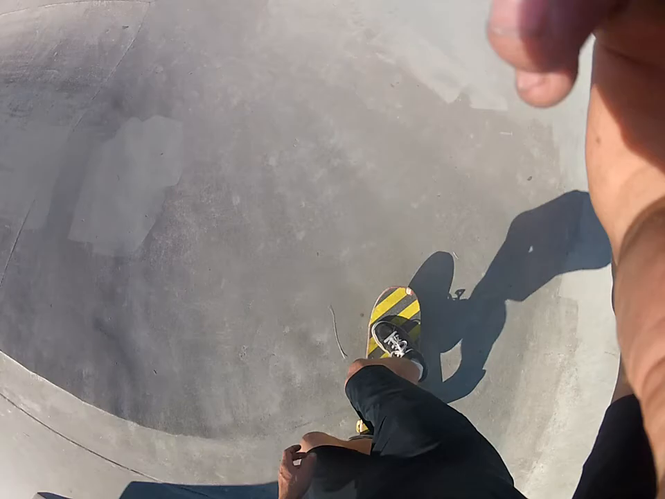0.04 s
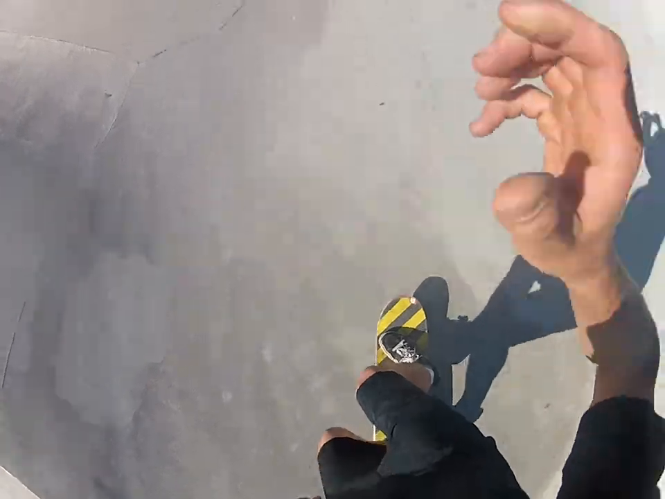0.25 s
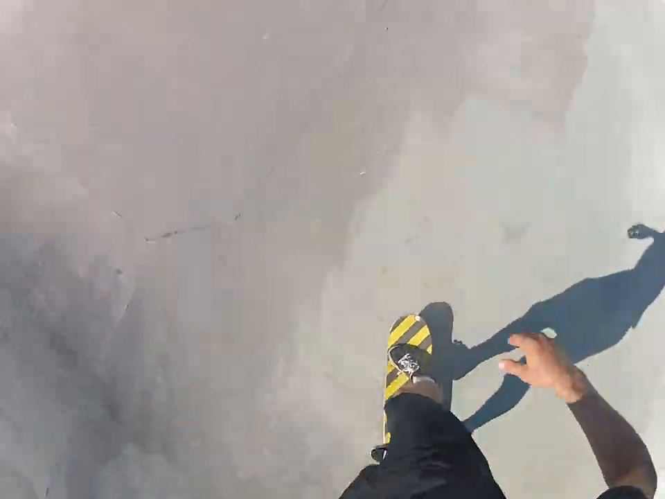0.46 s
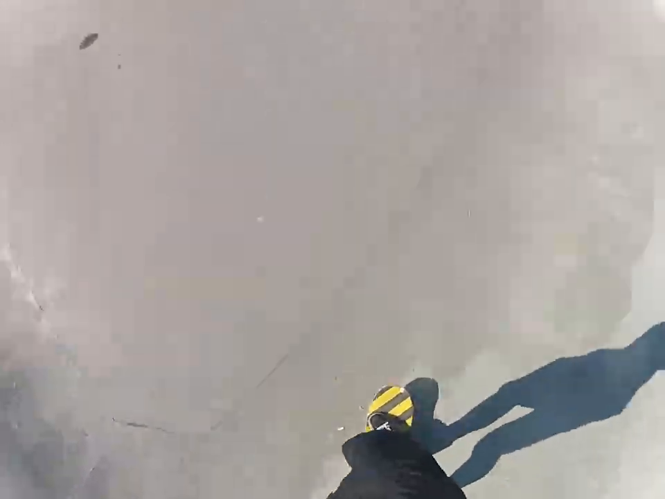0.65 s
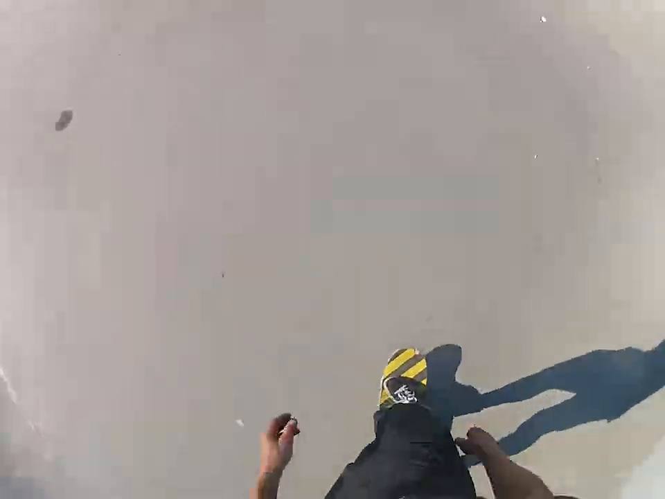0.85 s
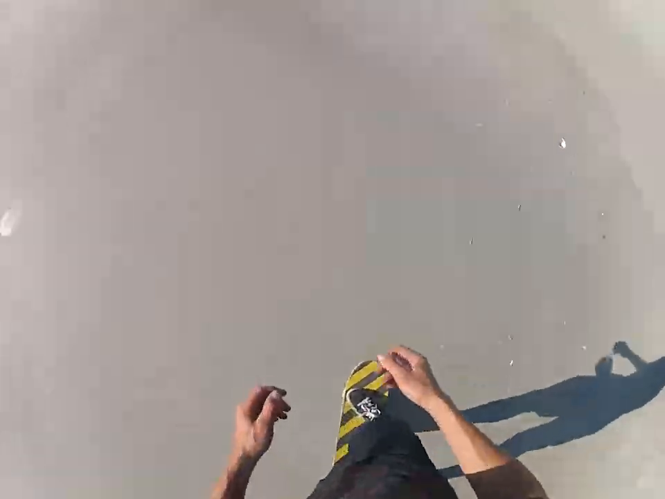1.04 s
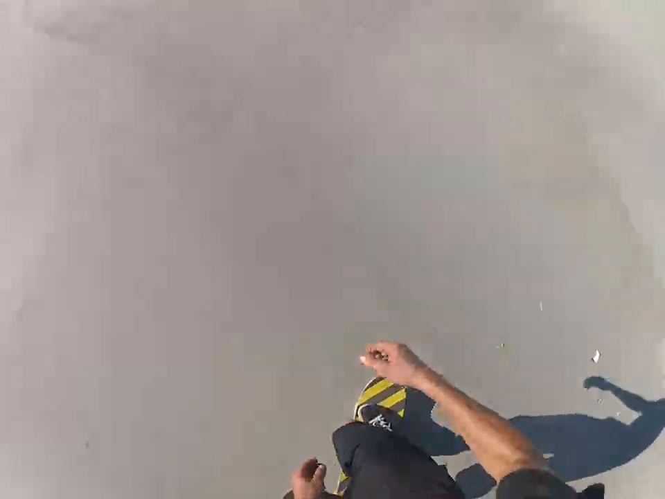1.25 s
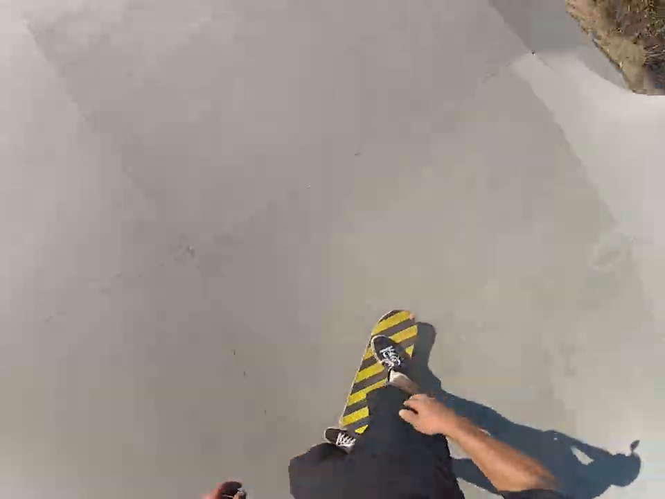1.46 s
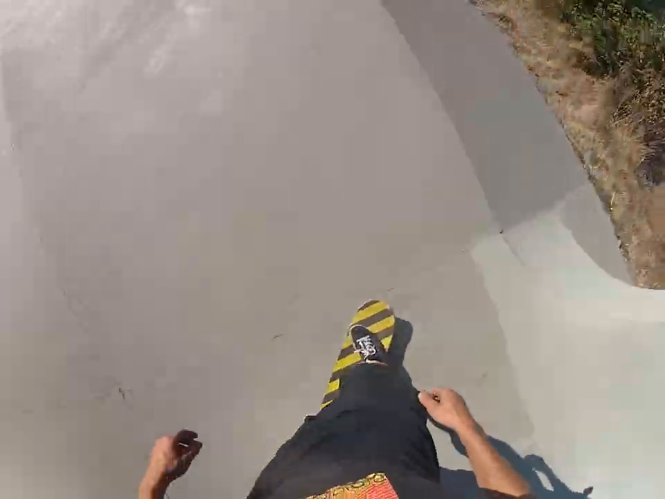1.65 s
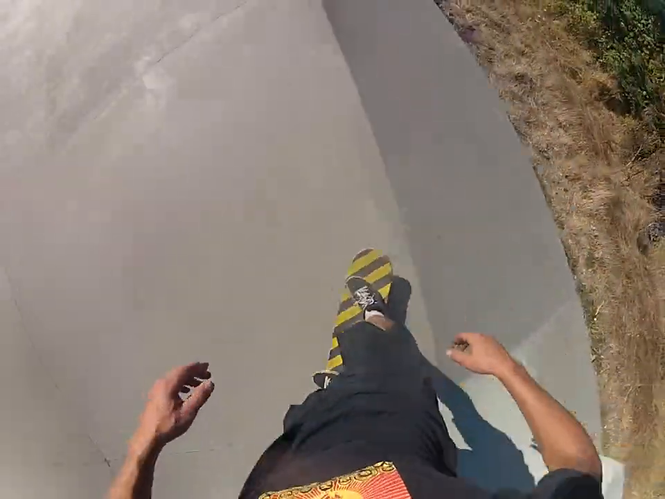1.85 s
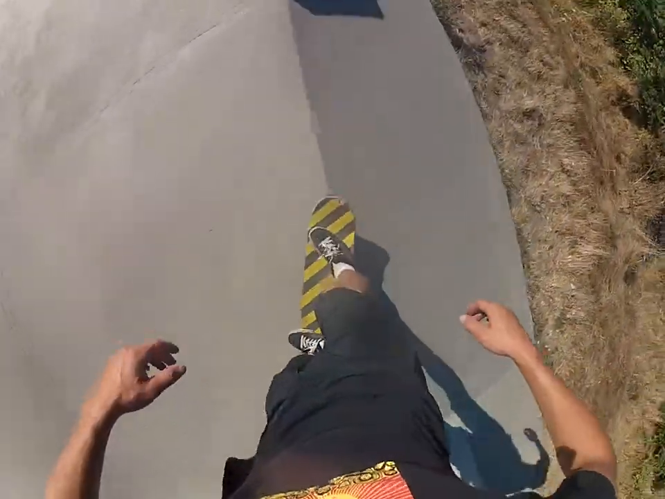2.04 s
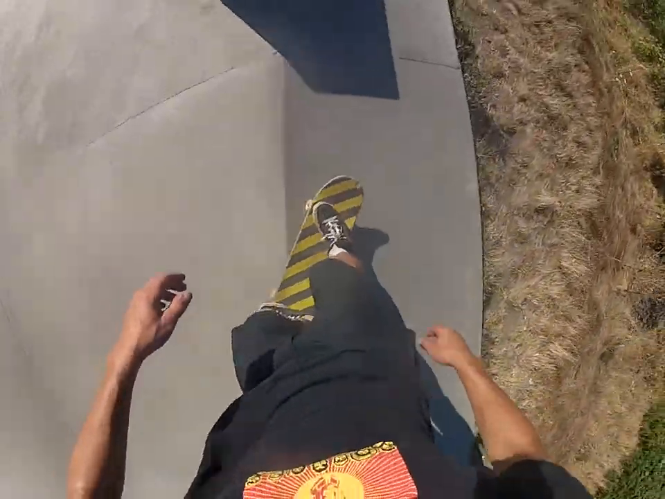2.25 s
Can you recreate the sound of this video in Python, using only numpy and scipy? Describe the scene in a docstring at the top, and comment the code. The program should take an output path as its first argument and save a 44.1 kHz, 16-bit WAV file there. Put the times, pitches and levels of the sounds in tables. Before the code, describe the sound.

Skateboard wheels roll with a soft roar around a smooth outdoor concrete bowl. Sharp plastic clacks and bumps hit the rider's microphone at the start, wind buffets it in short gusts, and lighter clacks return near the end.

```python
"""Skateboard wheels carve a smooth concrete bowl, heard from a camera worn by the rider.
The grain of the concrete makes them roar softly and scrub in the turns; the deck rumbles, grit ticks,
and wind buffets the microphone. Loose plastic, probably the camera mount, clacks against the case
in two short flurries. Low-rate sample-and-hold mirrors it all into a glassy treble."""
import sys
import numpy as np
from scipy import signal
from scipy.fft import rfft, irfft
from scipy.io import wavfile

SR = 44100
rng = np.random.default_rng(int(sys.argv[2]) if len(sys.argv) > 2 else 0)


def persist_wave(psi):
    """Save psi, clipped to +-1, as 16-bit WAV."""
    counts = np.round(np.clip(psi, -1, 1) * 32767).astype(np.int16)
    wavfile.write(sys.argv[1], SR, np.atleast_2d(counts).T)


N = 105840

START_S, FADE_IN_S = .1053, 0.00037
HOLD_HZ, BAND_HZ, TOP_HZ, MIRROR_DB = 12000, 5950, 15450, 0.45
GRIT_PER_S, GRIT_SPREAD_DB, GRIT_SHARE = 1800, 3.5, 0.45
ROAR_DB, HOLLOW_DB, HOLLOW_WIDTH_HZ = -0.5, -7, 186
TICK_DECAY_S, BREEZE_DB, BUMP_DECAY_CYCLES = 0.0053, -54, 0.54
SNAP_DB, SNAP_RISE_S, SNAP_DECAY_S = -5.5, 0.00014, 0.0019
RING_RISE_S, THUMP_S = 0.00022, 0.00066
RUSH_HISS_DB = -7

# ride of the rolling roar: t/s, level/dB, hollow centre f/Hz
ROLL_PATH = [(.1,-43,500),(.3,-48.5,480),(.48,-47.5,450),(.58,-45.5,540),(.78,-47,690),(.87,-48,600),(.97,-45,620),(1.1,-48.5,600),(1.23,-46.5,600),(1.38,-48,660),(1.53,-45.5,500),(1.68,-49.5,560),(1.8,-47.5,600),(2.0,-52.5,580),(2.2,-54,560),(2.4,-52.5,600)]
# tone of the roar: f/Hz, level/dB
ROAR_EQ = [(120,-1.5),(200,0.5),(300,-1),(520,-0.5),(720,-2.5),(840,-6),(950,-2),(1150,-10),(1600,-15),(2000,-14),(2900,-20.5),(3600,-24.5),(4400,-31),(5200,-27),(6000,-38)]
# dips in the concrete that swell the roar: t/s, half length/s, level/dB re the ride
CONCRETE_DIPS = [(.5,.03,-3),(.577,.018,-1),(1.226,.009,2),(1.53,.025,1)]
# tone of those swells: f/Hz, level/dB
DIP_EQ = [(150,-28),(400,-2.5),(560,7),(900,-15),(1600,-44)]
# deck vibration: t/s, level/dB
DECK_FADER = [(.1,-48.5),(.6,-43),(1.0,-42.5),(1.5,-45),(1.85,-48.5),(2.05,-50.5),(2.4,-55)]
# tone of the deck: f/Hz, level/dB
DECK_EQ = [(30,-1),(55,-4.5),(92,0),(140,-1.5),(200,-19.5),(350,-21.5),(800,-62)]
# sideways slip in the turns: t/s, level/dB
SCRUB_FADER = [(.1,-43),(.205,-54),(.233,-41),(.25,-58.5),(.3,-62.5),(.51,-66),(.555,-56.5),(.615,-54),(.66,-57.5),(.83,-54),(.92,-65.5),(1.45,-67),(1.66,-69.5),(2.0,-56.5),(2.15,-59),(2.24,-55.5),(2.3,-55.5),(2.4,-58.5)]
# tone of the slip: f/Hz, level/dB
SCRUB_EQ = [(300,-24.5),(1000,-10.5),(1350,2.5),(1650,-4),(2050,1),(2450,-1.5),(2900,0),(3300,-9.5),(3700,-4),(4400,-19.5),(5100,-13.5),(6000,-21)]
# grit under the wheels: t/s, level/dB
GRIT_TICKS = [(.496,-55),(0.554,-48.5),(0.618,-39),(0.716,-47),(.784,-43.5),(2.032,-50),(2.214,-49.5),(2.298,-46.5),(2.369,-54.5)]
# rasps where the wheels slip hardest: t/s, half length/s, level/dB
RASP_CUES = [(0.539,0.0047,-49),(0.554,0.0042,-43.5),(.58,0.018,-53.5),(0.602,.005,-44.5),(0.613,0.0066,-46.5),(0.65,0.018,-56),(.717,.006,-53),(1.61,0.007,-52),(2.182,.012,-54.5),(2.314,.04,-62)]
# rasp resonances: f/Hz, width/Hz, relative level/dB
RASP_BANDS = [(2080,350,-2.5),(2750,400,1),(3030,260,-3.5),(3650,310,-7.5)]
# wind gusts: t/s, half length/s, level/dB
GUST_CUES = [(.26,0.028,-44.5),(0.37,0.028,-38),(.52,0.033,-43),(1.322,0.055,-39),(1.534,0.038,-38.5),(1.785,0.033,-44),(1.886,0.034,-42),(2.245,0.062,-47.5)]
# tone of the buffeting: f/Hz, level/dB
WIND_EQ = [(10,4.5),(30,2.5),(60,1),(110,-13),(250,-32.5),(800,-52.5)]
# soft camera bumps: t/s, level/dB, f/Hz
BUMP_CUES = [(.108,-19,55.5),(0.146,-17,84.6),(0.189,-27.5,50.3),(.239,-25,84.5),(2.144,-23.5,65.6)]
# modes of the case: f/Hz, relative level/dB, t60/s
CASE_MODES = [(890,-5.5,0.04),(1160,-10,0.013),(1460,-2,0.018),(1737,-1,0.025),(1955,3,0.019),(2134,0,0.026),(2552,-5.5,0.028),(2980,-11,0.031),(3640,-8,0.029),(3910,-6.5,0.021),(4350,-28,0.019),(5470,-21,0.0047)]
# plastic hits: t/s, case level/dB, ring f/Hz, ring level/dB, ring t60/s, thump level/dB, damping time/s
CLACK_CUES = [(0.13,-5,2490,-7,0.0087,-45,0.0032),(0.1359,-16,2090,-7,0.037,-19.5,0.0074),(.1493,5.5,2770,1.5,0.019,-20,0.0032),(0.1501,-9.5,906,-0.5,0.02,-8,0.0026),
              (0.1633,-32,3830,-20,0.034,-25,0.012),(0.164,-36,2860,-10,0.007,-24,.004),(0.184,-19,3280,-21.5,0.017,-15,0.011),
              (0.7828,-37.5,1730,-32.5,.02,-66.5,.01),(0.9866,-39,2180,-39,0.022,-60.5,0.0082),(1.9217,-42,5130,-44.5,0.021,-60,.01),
              (1.9422,-18,1810,-47,0.019,-44,0.016),(1.9911,-35.5,2020,-58,.01,-70,0.012),(2.084,-21.5,1850,-40,.014,-48.5,0.016),
              (2.1071,-21.5,2820,-21,0.042,-56.5,0.0096),(2.1071,-40,486,-25.5,0.07,-48,0.0044),(2.1093,-28,830,-30,0.018,-54,0.0046),
              (2.1158,-12.5,3520,-18,0.018,-37,0.0071),(2.1209,-21.5,2370,-14,0.019,-58,0.0042),(2.1262,-23.5,2370,-23,0.0084,-60,0.0049),(2.3715,-56,5200,-48.5,0.013,-52,.01)]
# the loose part sliding on the case: t/s, half length/s, level/dB
SLIDE_CUES = [(0.13,0.0073,-32),(0.151,0.0068,-17),(0.163,0.0041,-31),(0.185,0.0025,-34),(2.108,.004,-44.5),(2.153,0.0034,-40)]
# tone of the sliding: f/Hz, level/dB
SLIDE_EQ = [(200,20),(900,4.5),(1200,2),(1500,7),(2100,-3.5),(2800,-1.5),(4000,-12),(6000,-37)]
# resonances of air passing the case: f/Hz, width/Hz, relative level/dB
RUSH_BANDS = [(1330,200,-5),(1930,110,0),(2570,140,-3),(3770,190,-7)]
# tone of its hiss: f/Hz, level/dB
RUSH_EQ = [(600,-14),(1800,-0.5),(3800,-3),(5500,-10),(8000,-40)]


def amp(db):
    """Decibels to gain."""
    return 10 ** (np.asarray(db) / 20)


def unit(x):
    """Scales to rms 1."""
    return x / np.sqrt(np.mean(x ** 2) + 1e-20)


def curve(rows, column=1):
    """One column of a time table as an automation curve."""
    rows = np.array(rows)
    return np.interp(np.arange(N) / SR, rows[:, 0], rows[:, column])


def colour(x, eq):
    """Applies an EQ shape, scaled so that white noise keeps its power."""
    hz, db = np.transpose(eq)
    gain = amp(np.interp(np.log(np.fft.rfftfreq(N, 1 / SR) + 1), np.log(hz), db))
    return irfft(rfft(x) * unit(gain), N)


def noise():
    """White noise of rms 1."""
    return rng.standard_normal(N)


def waver(rate_hz, depth_db):
    """A slow random gain."""
    lowpass = np.exp(-(np.fft.rfftfreq(N, 1 / SR) / rate_hz) ** 2)
    return amp(depth_db * unit(irfft(rfft(noise()) * lowpass, N)))


def swells(cues):
    """A bell-shaped rise and fall at each cue."""
    t = np.arange(N) / SR
    return sum(amp(db) * np.exp(-((t - s) / half_s) ** 2) for s, half_s, db in cues)


def noise_band(hz, width_hz):
    """Noise in a narrow resonance whose centre may move."""
    r = np.exp(-np.pi * width_hz / SR)
    slow = signal.lfilter([1], [1, -2 * r, r * r], noise() + 1j * noise())
    carrier = np.exp(2j * np.pi * np.cumsum(hz * np.ones(N)) / SR)
    return unit((slow * carrier).real)


def add(mix, s, sound):
    """Drops a sound into the mix at s seconds."""
    part = mix[round(s * SR):][:len(sound)]
    part += sound[:len(part)]


def concrete():
    """The surface under the wheels: fine texture with coarser grains."""
    grains = amp(GRIT_SPREAD_DB * np.minimum(rng.exponential(1, N), 5)) * np.sign(noise())
    grains *= rng.random(N) < GRIT_PER_S / SR
    return np.sqrt(GRIT_SHARE) * unit(grains) + np.sqrt(1 - GRIT_SHARE) * noise()


def wheel_roar():
    """Wheels roll over the grain; the roar swells in dips and its hollow centre moves along the bowl."""
    roar = amp(ROAR_DB) * colour(concrete(), ROAR_EQ) * waver(rate_hz=34, depth_db=0.5)
    hollow = amp(HOLLOW_DB) * noise_band(curve(ROLL_PATH, column=2), HOLLOW_WIDTH_HZ)
    dips = unit(colour(noise(), DIP_EQ)) * swells(CONCRETE_DIPS)
    return (roar + hollow + dips) * amp(curve(ROLL_PATH))


def deck_rumble():
    """The vibrating deck lays a low bed under the wheels."""
    return unit(colour(noise(), DECK_EQ)) * amp(curve(DECK_FADER))


def wheel_scrub():
    """Urethane slips over the concrete, rasps in the turns and now and then crunches grit."""
    slip = amp(curve(SCRUB_FADER)) * waver(rate_hz=52, depth_db=2)
    crunch, t = np.zeros(N), np.arange(SR // 20) / SR
    for s, db in GRIT_TICKS:
        add(crunch, s, amp(db) * np.exp(-t / TICK_DECAY_S))
    rasp = unit(sum(amp(db) * noise_band(hz, width) for hz, width, db in RASP_BANDS))
    friction = colour(concrete() * slip + noise() * crunch, SCRUB_EQ)
    return friction + rasp * swells(RASP_CUES)


def wind_buffet():
    """A steady breeze and short gusts rumble on the microphone."""
    return unit(colour(noise(), WIND_EQ)) * (amp(BREEZE_DB) + swells(GUST_CUES))


def camera_bumps():
    """Each soft bump of the camera is a bass pulse, gone in about a cycle."""
    out, t = np.zeros(N), np.arange(SR // 12) / SR
    for s, db, hz in BUMP_CUES:
        decay = np.exp(-(hz * t / BUMP_DECAY_CYCLES) ** 2)
        add(out, s, amp(db) * np.sin(2 * np.pi * hz * t) * decay)
    return out


def mount_clacks():
    """Each hit snaps, rings the case and the loose part, and thumps the microphone."""
    out, t = np.zeros(N), np.arange(SR // 12) / SR
    case = sum((-1) ** k * amp(db - 60 * t / t60) * np.sin(2 * np.pi * hz * t)
               for k, (hz, db, t60) in enumerate(CASE_MODES))
    case /= abs(case).max()
    u = t / THUMP_S
    thump = u * (2 - u) * np.exp(1 - u)  # one push and its rebound
    snap_envelope = amp(SNAP_DB) * np.exp(-t / SNAP_DECAY_S) * (1 - np.exp(-t / SNAP_RISE_S))
    for s, case_db, ring_hz, ring_db, ring_t60, thump_db, damp_s in CLACK_CUES:
        snap = rng.standard_normal(len(t)) * snap_envelope
        ring_envelope = amp(ring_db - 60 * t / ring_t60) * (1 - np.exp(-t / RING_RISE_S))
        ring = np.sin(2 * np.pi * ring_hz * t) * ring_envelope
        choke = 1 / (1 + (t / damp_s) ** 2)  # the parts damp each other
        add(out, s, (amp(case_db) * (case + snap) + ring) * choke + amp(thump_db) * thump)
    return out


def mount_slides():
    """The loose part scuffs along the case around the clacks."""
    return colour(noise(), SLIDE_EQ) * swells(SLIDE_CUES)


def air_rush(at_s, half_s, db):
    """Air sweeps past the case in one fluttering whoosh of breathy tones and hiss."""
    tones = unit(sum(amp(band_db) * noise_band(hz, width) for hz, width, band_db in RUSH_BANDS))
    hiss = amp(RUSH_HISS_DB) * unit(colour(noise(), RUSH_EQ))
    return (tones + hiss) * swells([(at_s, half_s, db)]) * waver(rate_hz=56, depth_db=-1.0)


def scene():
    """Board, air and camera mount, mixed at one microphone."""
    board = wheel_roar() + deck_rumble() + wheel_scrub()
    air = wind_buffet() + air_rush(at_s=1.313, half_s=0.16, db=-54)
    camera = camera_bumps() + mount_clacks() + mount_slides()
    return (board + air + camera)[None]


def record(dry):
    """The recorder switches on, clips the hardest clack and adds the glassy sheen of sample-and-hold."""
    t, hz = np.arange(N) / SR, np.fft.rfftfreq(N, 1 / SR)
    fade_in = np.clip((t - START_S) / FADE_IN_S, 0, 1)
    clipped = np.clip(dry * fade_in, -.9, .9)
    narrow = irfft(rfft(clipped) / (1 + (hz / BAND_HZ) ** 40), N)
    # holding samples mirrors the band around the hold rate and droops the treble
    mirrored = narrow * (1 + 2 * amp(MIRROR_DB) * np.cos(2 * np.pi * HOLD_HZ * t))
    held = irfft(rfft(mirrored) * np.sinc(hz / HOLD_HZ), N)
    high_cut = signal.firwin(255, TOP_HZ, window=("kaiser", 8), fs=SR)
    return signal.oaconvolve(held, high_cut[None], "same")


dry = scene()
out = record(dry)
persist_wave(out)
```